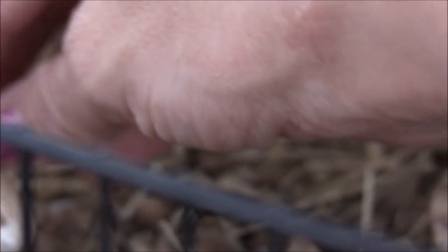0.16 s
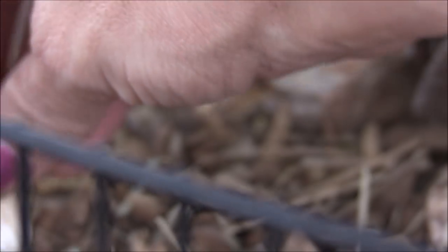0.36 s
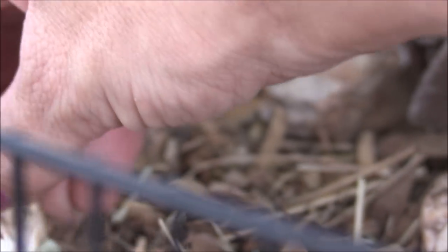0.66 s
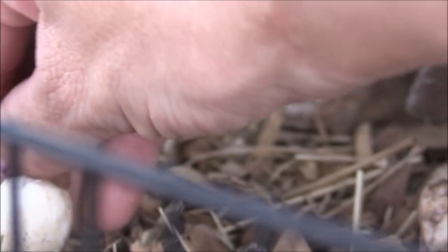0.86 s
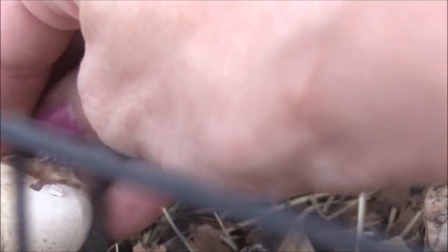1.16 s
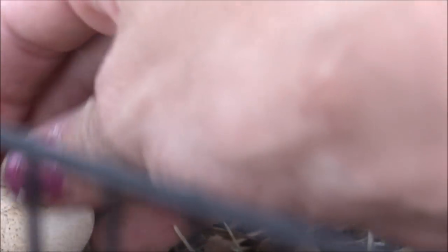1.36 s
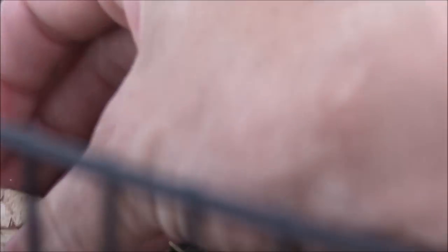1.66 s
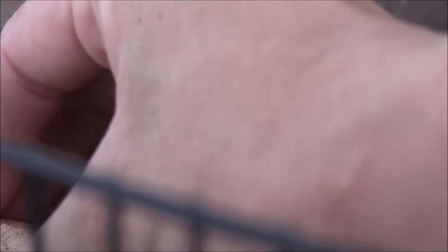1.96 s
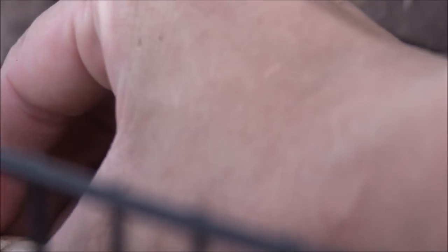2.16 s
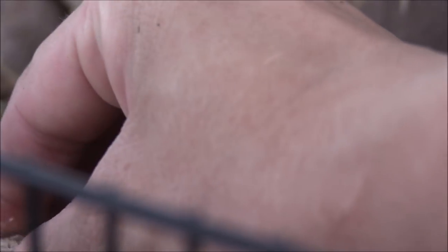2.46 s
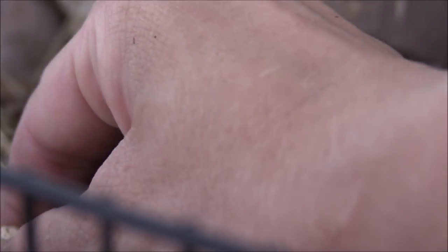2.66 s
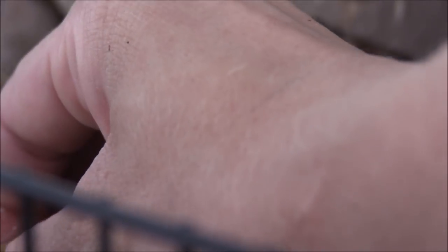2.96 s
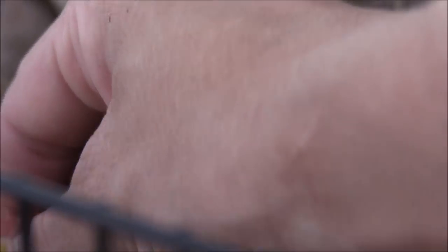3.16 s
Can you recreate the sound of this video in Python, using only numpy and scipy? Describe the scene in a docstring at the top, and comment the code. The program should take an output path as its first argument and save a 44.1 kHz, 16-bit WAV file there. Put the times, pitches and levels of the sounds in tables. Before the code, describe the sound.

Fingers pick at an eggshell, close and dry, over steady outdoor hiss and soft skin-on-straw rustle. Faint scraping starts near 0.3 s; crisp snaps, crunches and slight squeaks cluster from 0.55 to 1.15 s. A lull holds one faint, quick peep at 1.4 s. Rubbing returns around 1.6 s, then sharp hollow cracks, strongest near 2.1, 2.7 and 2.9 s, with dull little bumps, thinning after 3.2 s.

```python
"""Picking open an eggshell

Fingers pick at a cracked egg on straw bedding outdoors, close to a stereo microphone.
Damped sines make the snaps and chips; coloured grains make the crunches, scrapes and soft hand rustle.
The same breaks and strokes ring the hollow egg, a bank of resonances; squeaks and bumps are shaped noise.
One faint peep, like a chick's, is a gliding sine with a weak octave; steady filtered noise is the air."""
import sys
import numpy as np
from scipy import signal
from scipy.fft import rfft, irfft, next_fast_len
from scipy.io import wavfile
from scipy.ndimage import map_coordinates

SR = 44100
rng = np.random.default_rng(int(sys.argv[2]) if len(sys.argv) > 2 else 0)


def wav_record(signal):
    """Record a signal, one row per channel, as 16-bit PCM in the file named by sys.argv[1]."""
    frames = np.transpose(np.atleast_2d(signal))
    bounded = np.clip(frames, -1, 1)
    # unit amplitude maps onto the largest positive 16-bit level
    quanta = np.round(bounded * 32767).astype(np.int16)
    wavfile.write(sys.argv[1], SR, quanta)


N = 145530
SIDES = np.array([[1], [-1]])  # left, right


def amp(db):
    """Decibels to gain."""
    return 10 ** (np.asarray(db) / 20)


def unit(x):
    """Scale to rms 1."""
    return x / np.sqrt(np.mean(x ** 2) + 1e-20)


def along(points, hz):
    """Read a curve of (frequency [Hz], value) points on a log frequency axis."""
    f, value = np.transpose(points)
    return np.interp(np.log(hz + 1), np.log(f + 1), value)


def clock():
    """Time of each sample [s]."""
    return np.arange(N) / SR


def wobble(rate):
    """A smooth random curve with the given number of knots a second."""
    return map_coordinates(rng.standard_normal(N), [clock() * rate])


def filtered(x, response):
    """Multiply the spectrum of x by a complex response of frequency."""
    size = 2 * next_fast_len(N // 2 + 8192)  # even, with room for the filter's tail
    spectrum = rfft(x, size) * response(np.fft.rfftfreq(size, 1 / SR))
    return irfft(spectrum, size)[..., :N]


def causal(points, hz):
    """A minimum-phase response with the given colour, by folding its cepstrum."""
    cepstrum = irfft(np.log(amp(along(points, hz))))
    fold = np.sign(len(cepstrum) / 2 - np.arange(len(cepstrum))) + 1
    return np.exp(rfft(cepstrum * fold) - cepstrum[0])


def coloured(x, points):
    """x in a causal colour, at rms 1."""
    return unit(filtered(x, lambda hz: causal(points, hz)))


def grains(rate, spread_db, apart):
    """Random impulses of uneven size; the share `apart` of the power differs between the sides."""
    size = amp(spread_db * np.clip(rng.standard_normal((3, N)), -2, 2))
    hits = (rng.random((3, N)) < rate / SR) * size * rng.choice([-1, 1], (3, N))
    return unit(np.sqrt(1 - apart) * hits[0] + np.sqrt(apart) * hits[1:])


def burst(start, hold, t60):
    """Sudden onset, hold and exponential release."""
    t = clock() - start
    return (t >= 0) * amp(-60 * np.clip((t - hold) / t60, 0, 2))


def stroke(start, top, end):
    """Finger pressure builds and lets go."""
    return np.interp(clock(), [start, top, end], [0, 1, 0]) ** 0.63  # rounder than a triangle


def echo(x, t60):
    """A diffuse decaying-noise tail, different on each side."""
    t = np.arange(SR // 4) / SR
    tail = rng.standard_normal((2, len(t))) * amp(-60 * t / t60) * (1 - np.exp(-t / .001))
    tail = tail / np.linalg.norm(tail, axis=1, keepdims=True)
    return signal.fftconvolve(np.atleast_2d(x), tail, axes=1)[:, :N]


# Single fractures of the shell:
# (time [s], snap level [dB], flake pitch [Hz], splinter level [dB], hollow ring level [dB])
SNAP_TABLE = [(.4063, -32, 2660, -35, -38), (0.564, -28, 2166, -54, -36), (.5897, -10.5, 6600, -33, -48),
              (0.6136, -11.5, 7640, -29, -42), (0.629, -35, 6060, -32, -39), (0.8194, -20, 6000, -45, -43),
              (.834, -24, 5500, -41, -49), (0.9074, -19.5, 5600, -37, -52), (0.952, -20, 5500, -46, -50),
              (.976, -14.5, 5570, -35, -50), (.9977, -14, 3240, -28.5, -46), (1.0134, -17, 5800, -38, -54),
              (1.1267, -15, 5650, -37, -46), (1.1376, -17, 5800, -49, -60), (1.752, -20, 5530, -34, -38),
              (1.758, -38, 2850, -37, -26.5), (1.7948, -25, 2700, -34, -52.5),
              (1.8996, -32, 2670, -41, -42), (1.9174, -24.5, 5100, -24, -50.5),
              (1.9314, -16, 5830, -34.5, -56), (1.9475, -32, 7000, -29.5, -47),
              (1.990, -27, 3900, -46, -40), (2.0829, -12, 4400, -23.5, -50), (2.1168, -4.5, 3960, -20, -27),
              (2.1474, -10.5, 3180, -18.5, -21), (2.2082, -20.5, 3980, -46, -55),
              (2.2589, -13.5, 2820, -28, -29), (2.3295, -17, 12000, -43, -52),
              (2.3638, -11.5, 4500, -45, -48), (2.4067, -20, 5530, -52, -40),
              (2.516, -24.5, 3030, -27, -40), (2.6244, -19, 5300, -26.5, -34),
              (2.6767, -24, 2540, -33, -46), (2.7052, -7.5, 9750, -22, -32), (2.7192, -16, 9600, -30, -33),
              (2.733, -20, 5330, -27.5, -34), (2.7428, -21.5, 3670, -30, -45),
              (2.7525, -31, 5150, -28.5, -36), (2.789, -26, 5500, -37, -44),
              (2.8086, -16, 5000, -21.5, -40), (2.8275, -34, 4600, -26.5, -28),
              (2.8431, -24, 2630, -31, -30), (2.8996, -7, 5430, -26.5, -60), (2.905, -20, 5000, -27, -53),
              (2.9176, -20, 2630, -27, -29.5), (2.9395, -10, 5940, -29, -47), (2.944, -24, 5600, -37, -37),
              (2.9652, -19, 5740, -34, -35), (2.9794, -22, 5300, -33, -40), (3.0939, -20, 2890, -40, -38),
              (3.1336, -24, 2630, -51, -45), (3.1674, -36, 5590, -28.5, -48)]
# Thin high chips: (time [s], level [dB], pitch [Hz])
CHIP_TABLE = [(2.701, -11.5, 13800), (2.702, -30, 14100), (2.9397, -21, 13200)]
SNAP_DECAY_CYCLES, SNAP_RISE_CYCLES = 1.4, 0.5
SNAP_SWING_S = 0.000014  # typical shift of each side, in opposite directions
FLICK_DB = -4  # peak of the flick against the table's snap level
CHIP_T60 = 0.0062  # s


def snaps():
    """Each fracture flicks a flake for a cycle or two, from its own spot; thin chips are decaying sines."""
    out = np.zeros((2, N + SR))
    t = np.arange(SR // 50) / SR
    swings = rng.standard_normal(len(SNAP_TABLE))
    for (start, db, hz, _, _), swing in zip(SNAP_TABLE, swings):
        cycles = hz * np.maximum(t + SNAP_SWING_S * swing * SIDES, 0)
        envelope = np.exp(-cycles / SNAP_DECAY_CYCLES) * (1 - np.exp(-cycles / SNAP_RISE_CYCLES))
        flick = np.sin(2 * np.pi * cycles) * envelope
        # the first swing is negative
        out[:, round(start * SR):][:, :len(t)] -= amp(db + FLICK_DB) * flick / abs(flick).max()
    for start, db, hz in CHIP_TABLE:
        chip = amp(db - 60 * t / CHIP_T60) * np.sin(2 * np.pi * hz * t)
        out[:, round(start * SR):][:, :len(t)] += chip
    return out[:, :N]


# Quick runs of fractures: (time [s], length [s], crackle level [dB], hollow ring level [dB])
CRUNCH_TABLE = [(0.589, 0.0025, -30.5, -59), (.6255, 0.0038, -33, -44), (0.632, 0.004, -36, -38),
                (.652, .005, -34, -54), (.685, 0.0033, -49, -46), (.794, 0.0065, -36, -29.5),
                (0.805, 0.01, -28, -35.5), (.8195, 0.005, -21, -27.5), (0.829, 0.011, -27.5, -61),
                (1.127, .004, -38.5, -53), (1.815, 0.0055, -41.5, -31.5), (2.1225, 0.0033, -25.5, -24),
                (2.128, 0.0037, -47, -40), (2.151, 0.0041, -34, -27.5), (2.1605, 0.004, -27, -31),
                (2.347, 0.0063, -39, -39), (2.588, .014, -40, -35), (2.83, 0.0025, -35, -37),
                (2.836, 0.0034, -50, -42), (2.923, 0.0063, -49, -39), (2.931, 0.002, -37, -46),
                (2.943, 0.0099, -43, -47)]
# Finger strokes over the shell:
# (start [s], strongest [s], end [s], grit level [dB], hollow ring level [dB])
STROKE_TABLE = [(0.26, 0.357, 0.428, -54.5, -46), (0.391, .415, .51, -49.5, -42.5),
                (0.528, 0.644, 0.74, -43, -40.5), (0.675, 0.757, .80, -35.5, -30.5),
                (0.768, 0.814, 0.86, -40, -31), (0.834, 0.986, 1.1, -66, -50.5),
                (1.08, 1.107, 1.255, -49.5, -46.5), (1.599, 1.723, 1.876, -46, -40),
                (1.88, 2.068, 2.24, -51.5, -45), (2.289, 2.34, 2.376, -38.5, -38),
                (2.365, 2.451, 2.57, -43.5, -36.5), (2.557, 2.598, 2.67, -39, -39.5),
                (2.684, 2.746, 2.87, -42.5, -41.5), (2.785, 2.87, 3, -50, -50.5),
                (2.883, 2.95, 3.09, -48, -47.5), (3.018, 3.117, 3.22, -48.5, -42)]
# Colour of breaking and rubbed shell: (frequency [Hz], relative level [dB])
GRIT_COLOUR = [(300, -35.5), (1000, -5), (2000, -3), (2800, 1), (4000, -0.5), (5800, 3.5), (8500, -2),
               (10500, -1), (14000, -8), (16000, -16)]
SPLINTER_T60, CRUNCH_T60 = 0.013, 0.012  # s
CRUMB_DB, CRUMB_MOST_DB = -3, -44  # crumbs against the rubbing, and their ceiling


def crackle(jerk):
    """Bright micro-fractures: splinters after a snap, crunches, and grit and crumbs under the strokes."""
    breaking = sum(amp(db) * burst(s, 0, SPLINTER_T60) for s, _, _, db, _ in SNAP_TABLE)
    breaking = breaking + sum(amp(db) * burst(s, length, CRUNCH_T60) for s, length, db, _ in CRUNCH_TABLE)
    rubbing = jerk * sum(amp(db) * stroke(a, b, c) for a, b, c, db, _ in STROKE_TABLE)
    fractures = coloured(grains(rate=12000, spread_db=5.5, apart=0.37), GRIT_COLOUR)
    grit = coloured(grains(rate=3500, spread_db=8, apart=0.37), GRIT_COLOUR)
    crumbs = coloured(grains(rate=220, spread_db=10, apart=0.2), GRIT_COLOUR)
    crumb_gain = np.minimum(amp(CRUMB_DB) * rubbing, amp(CRUMB_MOST_DB))
    return breaking * fractures + rubbing * grit + crumb_gain * crumbs


# Overall colour of the hollow egg: (frequency [Hz], relative level [dB])
HOLLOW_COLOUR = [(60, -41), (120, -24), (200, -20), (290, -6), (450, -13), (620, -9.5), (780, 0.5),
                 (1150, 1), (1700, -4.5), (2700, -6.5), (4000, -17.5), (8000, -20)]
# Resonances of the egg: (frequency [Hz], width [Hz], relative level [dB])
EGG_MODES = [(760, 46, -3), (1132, 250, -5), (1453, 150, -2.5), (1998, 220, -1.5), (2790, 310, 2.5),
             (3920, 230, 14)]
EGG_BROAD_DB = 1.5  # unresonant part, on the same scale as the resonances
RING_T60 = 0.017  # s, of the drive after a snap
CLUMP_DB = -3  # small catches of the fingers that knock the egg, against the fine grains


def egg_response(hz):
    """Parallel band-pass resonances on a broad path, in the hollow colour, at rms 1 over frequency."""
    modes = sum(amp(db) * 1j * hz * width / (centre ** 2 - hz ** 2 + 1j * hz * width)
                for centre, width, db in EGG_MODES)
    response = causal(HOLLOW_COLOUR, hz) * (amp(EGG_BROAD_DB) + modes)
    return response / np.sqrt(np.mean(abs(response) ** 2))


def hollow(jerk):
    """The same snaps, crunches and strokes drive the hollow egg with grains."""
    breaking = sum(amp(db) * burst(s, 0, RING_T60) for s, _, _, _, db in SNAP_TABLE)
    breaking = breaking + sum(amp(db) * burst(s, length, CRUNCH_T60) for s, length, _, db in CRUNCH_TABLE)
    rubbing = jerk * sum(amp(db) * stroke(a, b, c) for a, b, c, _, db in STROKE_TABLE)
    fine = grains(rate=7000, spread_db=2.5, apart=0.43)
    clumps = grains(rate=170, spread_db=3, apart=0.21)
    drive = breaking * fine + rubbing * unit(fine + amp(CLUMP_DB) * clumps)
    return filtered(drive, egg_response)


# Narrow rubbing notes: (start [s], strongest [s], end [s], pitch [Hz], level [dB])
SQUEAK_TABLE = [(0.55, 0.56, 0.68, 2030, -45), (0.747, 0.82, 0.82, 2780, -32),
                (0.837, .90, 1.09, 1830, -47), (.955, 0.984, 1.02, 3050, -46.5),
                (1.02, 1.112, 1.1, 1850, -44)]
SQUEAK_WIDTH = 0.08  # half-width of the band, as a share of the pitch


def squeaks():
    """Now and then the rubbing gathers round one pitch: noise in a narrow band."""
    def note(hz):
        band = lambda f: 1 / (1 + ((f / hz - 1) / SQUEAK_WIDTH) ** 2)
        return unit(filtered(rng.standard_normal(N), band))
    return sum(amp(db) * stroke(a, b, c) * note(hz) for a, b, c, hz, db in SQUEAK_TABLE)


# Soft bumps of the egg on its bedding: (time [s], level [dB])
BUMP_TABLE = [(.62, -43.5), (.75, -44), (.812, -52), (1.818, -52), (2.123, -42), (2.15, -45), (2.842, -42),
              (2.919, -37.5), (3.113, -45)]
# Colour of the bedding: (frequency [Hz], relative level [dB])
BEDDING_COLOUR = [(60, -29), (130, -33), (220, -6.5), (300, 2), (450, -5.5), (750, 0), (1500, -46),
                  (4000, -52)]
BUMP_T60 = 0.091  # s


def bumps():
    """The egg is nudged against the straw: dull decaying noise."""
    thud = coloured(rng.standard_normal(N), BEDDING_COLOUR)
    return sum(amp(db) * burst(s, 0, BUMP_T60) for s, db in BUMP_TABLE) * thud


# Rustle of the moving hand: (time [s], level [dB])
RUSTLE_LEVEL = [(0, -49.5), (.25, -48.5), (.36, -46.5), (.52, -46.5), (.9, -41.5), (1.2, -43.5), (1.4, -42),
                (1.5, -42), (1.9, -43), (2.25, -42), (2.7, -44), (3.02, -44), (3.3, -42.5)]
# Colour of skin on straw: (frequency [Hz], relative level [dB])
SKIN_COLOUR = [(100, -13), (300, -4), (600, -3), (1000, 2), (1900, 0.5), (3500, -2.5), (6000, -5.5),
               (8500, -9.5), (14000, -15.5), (16000, -37)]


def rustle():
    """Skin and straw brush softly as the hand moves: dense grains at an uneven level."""
    s, db = np.transpose(RUSTLE_LEVEL)
    level = amp(np.interp(clock(), s, db) + 0.79 * wobble(rate=38))
    return level * coloured(grains(rate=4000, spread_db=6, apart=0.6), SKIN_COLOUR)


# A faint peep in two notes: (time [s], pitch [Hz], level [dB])
PEEP_TRACK = [(1.345, 3154, -65), (1.352, 3260, -35.5), (1.369, 3690, -45), (1.378, 3885, -28),
              (1.383, 3980, -39), (1.385, 3955, -70), (1.394, 4800, -65), (1.399, 4740, -37.5),
              (1.403, 4580, -65), (1.406, 3790, -38), (1.412, 3840, -32), (1.416, 3500, -46),
              (1.421, 3220, -38), (1.428, 3130, -65)]
PEEP_OCTAVE_DB, PEEP_ROUGH = -13.5, 0.022  # octave against the whistle; random share of the pitch
PEEP_ECHO_DB, PEEP_ECHO_T60 = -7, 0.29  # dB against the call, s


def peep():
    """A thin whistle that rises and falls, with a weak octave and a soft echo."""
    s, hz, db = np.transpose(PEEP_TRACK)
    pitch = np.interp(clock(), s, hz) * (1 + PEEP_ROUGH * wobble(rate=980))
    phase = 2 * np.pi * np.cumsum(pitch) / SR
    tone = np.sin(phase) + amp(PEEP_OCTAVE_DB) * np.sin(2 * phase)
    call = np.interp(clock(), s, amp(db), left=0, right=0) * tone
    return call + amp(PEEP_ECHO_DB) * echo(call, PEEP_ECHO_T60)


# Colour of the outdoor air: (frequency [Hz], relative level [dB])
AIR_COLOUR = [(25, -9), (120, -10), (170, -5), (280, -6), (480, -3.5), (780, 9.5), (1000, 13.5), (1500, 3),
              (3000, -5.5), (6000, -9.5), (8600, -16), (14000, -20), (16000, -26)]
# Likeness of the two sides of the air: (frequency [Hz], left-right correlation [-1 to 1])
AIR_ALIKE_CURVE = [(30, -0.055), (150, -0.27), (400, -0.17), (900, -0.93), (1600, -0.99), (2600, -0.49),
                   (5000, -0.15), (12000, 0.011)]
AIR_DB = -42.5  # rms


def air():
    """Steady outdoor hiss, wide in the midrange: mid and side noise mixed by the wanted correlation."""
    def mid_side(hz):
        turn = np.arccos(np.clip(along(AIR_ALIKE_CURVE, hz), -.98, .98)) / 2
        return amp(along(AIR_COLOUR, hz)) * [np.cos(turn), np.sin(turn)]
    mid, side = filtered(rng.standard_normal((2, N)), mid_side)
    return amp(AIR_DB) * unit(np.array([mid + side, mid - side]))


# Lead of the left side of the microphone: (frequency [Hz], phase lead [rad])
LEFT_LEAD = [(100, .1), (300, 1.5), (600, 2.63), (950, 2.05), (1500, 0.84), (3000, 0.72), (6000, 0.54),
             (8500, 1.61), (11000, 1.56), (15000, 1.9)]
LEFT_DB = 0.6  # left raised and right lowered by this much
SCATTER_DB, SCATTER_T60 = -10.5, 0.027  # dB against the direct sound, s


def nearby(x):
    """Close sound reaches the left side first; hand and bedding scatter a short tail."""
    direct = filtered(x, lambda hz: np.exp(.5j * SIDES * along(LEFT_LEAD, hz)))
    return amp(LEFT_DB * SIDES) * (direct + amp(SCATTER_DB) * echo(x, SCATTER_T60))


def scene():
    """All close sounds in one spot, over the outdoor air; the fingers stick and slip."""
    jerk = amp(1.5 * wobble(rate=130))  # uneven rubbing, in dB
    breaking = snaps() + crackle(jerk) + hollow(jerk)
    return nearby(breaking + squeaks() + bumps() + rustle() + peep()) + air()


def record(dry):
    """The microphone passes nothing from 16 kHz up."""
    return filtered(dry, lambda hz: hz < 16000)


dry = scene()
out = record(dry)
wav_record(out)
```